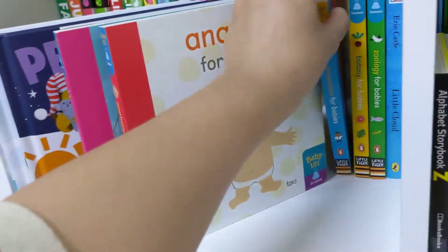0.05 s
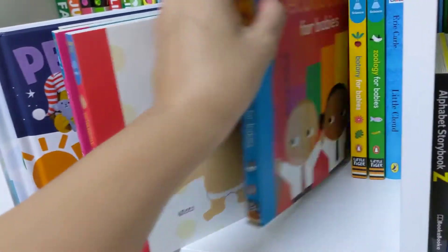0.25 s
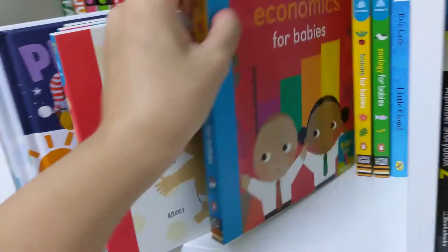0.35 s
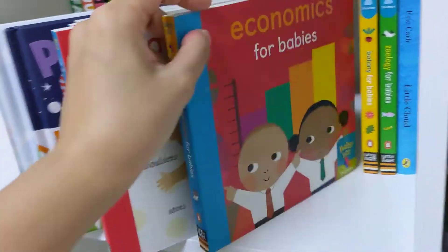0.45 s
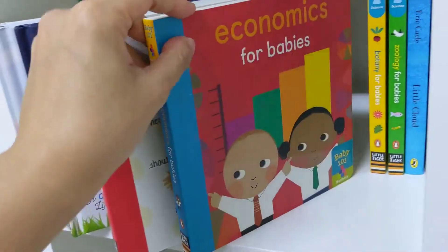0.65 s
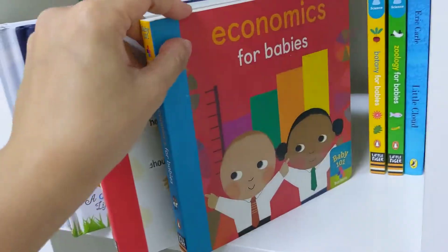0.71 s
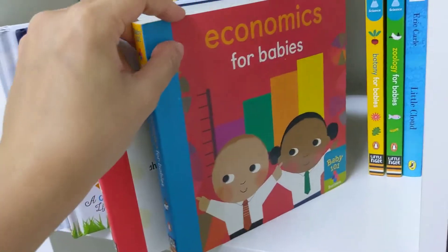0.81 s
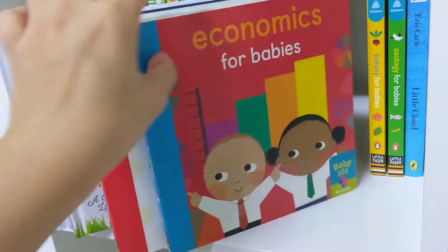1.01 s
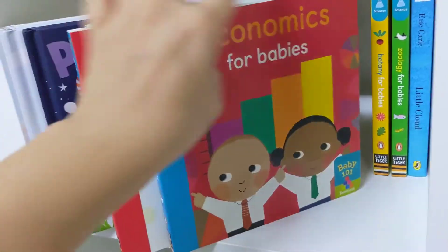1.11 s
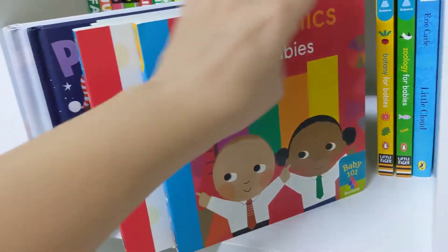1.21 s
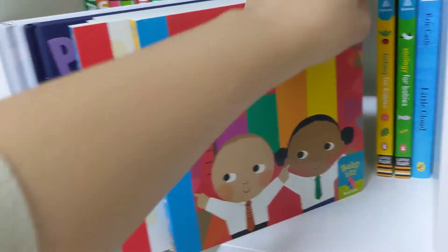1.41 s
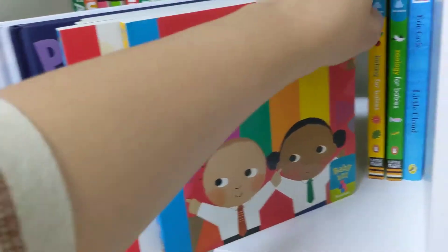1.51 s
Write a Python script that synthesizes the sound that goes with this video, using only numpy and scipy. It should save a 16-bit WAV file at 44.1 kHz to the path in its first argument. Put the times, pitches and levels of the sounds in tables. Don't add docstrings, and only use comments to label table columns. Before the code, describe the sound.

Thick cardboard books knock on a hollow shelf, heard close in a quiet room. After faint rubbing, a book comes loose with a bump and scrape at 0.2 seconds, then drops with the loudest clack at 0.31. Smaller knocks follow at 0.46, 0.55 and 0.61, with a tap at 0.64. Then only faint ticks, a soft muffled thud near 1.1, and tiny skin squeaks around 1.25 over low room air.

```python
import sys
import numpy as np
from scipy import signal
from scipy.fft import irfft
from scipy.io import wavfile
from scipy.ndimage import uniform_filter1d

SR = 44100
rng = np.random.default_rng(int(sys.argv[2]) if len(sys.argv) > 2 else 0)


def store_pcm(level_fs):
    pcm = np.round(np.clip(level_fs, -1, 1) * 32767).astype(np.int16)
    wavfile.write(sys.argv[1], SR, np.atleast_2d(pcm).T)


def how_loud(loudness_db):
    steps = np.asarray(loudness_db, float) / 20
    return 10 ** steps


N = 68355

# (frequency [Hz], level [dB], t60 [s])
SHELF = [(160, -5, .12), (197, -2, .1), (255, -4, .07), (292, 0, .08)]
# (frequency [Hz], likeness [0-1])
LIKENESS = [(40, 1), (150, 0.93), (300, .9), (700, 1), (1400, 0.7), (3000, 0)]


def evened(x):
    return x / np.sqrt(np.mean(x ** 2) + 1e-20)


def read(points, hz):
    f, value = np.transpose(points)
    return np.interp(np.log(hz + 1), np.log(f + 1), value)


def add(mix, s, sound):
    part = mix[..., round(s * SR):][..., :sound.shape[-1]]
    part += sound[..., :part.shape[-1]]


def partly_alike(left, other, hz):
    same = np.clip(read(LIKENESS, hz), 0, 1)[:, None]
    return np.array([left, same * left + np.sqrt(1 - same ** 2) * other])


def noise(colour, patchy_db, size=512):
    frames, hz = 4 * N // size + 5, np.fft.rfftfreq(size, 1 / SR)
    a, b, c, d, patches = rng.standard_normal((frames, len(hz), 5)).T
    patches = uniform_filter1d(patches, size=8, axis=0)
    patches = evened(uniform_filter1d(patches, size=8, axis=1))
    z = partly_alike(a + 1j * b, c + 1j * d, hz)
    z *= how_loud(read(colour, hz)[:, None] + patchy_db * patches)
    sound = signal.istft(z, nperseg=size, noverlap=3 * size // 4)[1]
    return evened(sound[:, :N])


def ring(modes, lasting=1):
    t, side = np.arange(SR // 4) / SR, np.array([[1], [-1]])
    port_turn = 0.19
    total = 0
    for k, (hz, db, t60) in enumerate(modes):
        sign = (-1) ** (k % 3 // 2)
        level = how_loud(db - 60 * t / (t60 * lasting)) / np.sqrt(lasting)
        turn = side * port_turn * (-1) ** k * np.minimum(hz * t, 1) * min(hz / 1000, 1)
        total = total + sign * level * np.sin(2 * np.pi * hz * t + turn)
    return total


def knocks(contacts, modes, stilled, crackle, lasting):
    out, t = np.zeros((2, N)), np.arange(SR // 20) / SR
    free, shelf = ring(modes, lasting), ring(SHELF)
    still_s, still_db_per_s = stilled
    crack_rise_s, crack_t60_s = 0.00039, 0.017
    crack_shape = np.minimum(t / crack_rise_s, 1) * how_loud(-60 * t / crack_t60_s)
    for s, db, contact_ms, shelf_db, crack_db in contacts:
        u = t[:200] / (max(contact_ms, .05) / 1000)
        push = np.sin(np.pi * np.minimum(u, 1)) ** 2
        pressed = np.maximum(np.arange(SR // 4) / SR + s - max(still_s, s), 0)
        board = free * how_loud(-abs(still_db_per_s) * pressed)
        body = signal.oaconvolve(board + how_loud(shelf_db) * shelf, push[None] / push.sum())
        add(out, s, how_loud(db - 9.5) * body)
        crack = crackle[:, round(s * SR):][:, :len(t)] * crack_shape
        add(out, s, how_loud(db + crack_db) * crack)
    return signal.sosfilt(signal.butter(2, 110, "high", fs=SR, output="sos"), out)


def book_knocks(crackle, lasting):
    # (frequency [Hz], level [dB], t60 [s])
    pulled_book = [(344, -3, 0.04), (568, 4, 0.028), (780, -0.5, 0.012), (1310, -5.5, 0.033),
                   (1680, -7.5, 0.051), (1900, -8, 0.04), (2920, -14, .025), (3900, -7.5, .03),
                   (440, -3, 0.024)]
    front_book = [(405, 2.5, 0.068), (487.4, -3, 0.097), (549, -9, 0.21), (715, 2, 0.045), (910, -1.5, .04),
                  (936, -17, 0.12), (1148, 5.5, 0.051), (1295, -4, .05), (1430, -1, 0.089),
                  (1578, 3.5, .05), (1765, -0.5, 0.13), (1923, -9, 0.15), (2970, -16, .04),
                  (2950, -15, .04)]
    back_book = [(321.6, -1, 0.12), (442, -7.5, 0.092), (580, 4, 0.059), (717, 0.5, 0.054),
                 (820, 1.5, 0.032), (1164, 5, 0.039), (1300, 5.5, 0.034), (920, -13, 0.022)]
    inner_book = [(300, -2.5, 0.035), (363.5, -1.5, 0.11), (442.5, -1.5, 0.15), (567, 0, 0.04),
                  (680, 1.5, 0.035), (910, 0, 0.09), (1114, -4, 0.026), (1252, -4.5, 0.058),
                  (1450, 4.5, 0.023), (1805, -2.5, 0.067), (2080, -19, 0.024), (2520, -24, 0.022),
                  (2880, -20, 0.027), (3220, -16, .03)]
    spine = [(480, -8, .05), (600, -1, .06), (730, -7, .04), (842, 5, .12), (1150, 6.5, .12),
             (1270, -3, .05), (1490, -5, .025), (1700, -10, .04), (2100, -9, .05), (2770, -10, .04),
             (3230, -11, .03), (231, -10, .06)]
    stack = [(108, -2, 0.61), (211, 2.5, 0.084), (290, 2, 0.098), (481, -2, 0.1), (878, 13.5, 0.042),
             (1100, 7.5, 0.028), (1315, 9, 0.045), (1860, -3, 0.051)]
    # (time [s], blow [dB], contact [ms], shelf share [dB], crack [dB])
    pull = [
        (.2008, -22, .2, -4.5, -5.5),
        (.2142, -18.5, .25, -7.5, -24),
        (.2162, -13.5, .8, -1.5, -25.5),
        (.2240, -32.5, .6, -2, -21.5),
        (.2340, -18.5, .16, -5, -2),
        (.2385, -38.5, .3, -4, -21),
    ]
    drop = [
        (.3110, -20, 0.11, -18.5, -17),
        (.3125, -5, 0.25, -32.5, -13),
        (.3145, -10, 0.19, -3, 0),
        (.3185, -13, 0.23, 0.5, -25.5),
        (.3245, -23.5, 0.55, 0, -28),
        (.3400, -21.5, 0.25, -11.5, -24.5),
        (.3445, -32, 0.74, -1.5, -25.5),
    ]
    settle = [
        (.4600, -21, 0.39, -31, -25.5),
        (.4635, -17, 1.04, -5.5, -32),
        (.4680, -22, 0.71, 4.5, -21.5),
        (.4740, -32.5, 1.6, -2.5, -34),
    ]
    slap = [
        (.5535, -28, 0.44, -1, 5.5),
        (.5550, -14, 0.41, -27.5, -10.5),
        (.5580, -20.5, .8, -26, -9),
        (.5615, -20.5, 1.5, -19, -18),
        (.5690, -28, 1.54, 6.5, -26),
    ]
    lean = [
        (.6130, -23, 0.5, -24, 2),
        (.6149, -15, 0.44, -9, -2),
        (.6184, -19, 0.51, -42, -19),
        (.6211, -23.5, 0.18, -21, -7),
    ]
    fall_back = [
        (1.096, -47, 1.2, 0, -11),
        (1.109, -40.5, 0.26, -3, -22),
        (1.120, -41.5, 1.3, 7, -23),
        (1.129, -42, 0.41, -1.5, -25),
        (1.145, -42, 1.8, -4, -22),
        (1.165, -54, 1.1, 2, -5),
    ]
    # (from time [s], extra decay [dB/s])
    free, drop_stilled, lean_stilled = (2, 0), (.3235, 1300), (.6235, 2200)
    hits = [(pull, pulled_book, free), (drop, front_book, drop_stilled), (settle, back_book, free),
            (slap, inner_book, free), (lean, spine, lean_stilled), (fall_back, stack, free)]
    return sum(knocks(*hit, crackle, lasting) for hit in hits)


def strokes(rows, release=1.3):
    t, power = np.arange(N) / SR, np.zeros(N)
    for start, length, db, rise in rows:
        u, rise = np.clip((t - start) / length, 0, 1), np.clip(rise, .02, .95)
        fall = np.clip((1 - u) / (1 - rise), 0, 1) ** release
        power += (how_loud(db) * np.minimum(u / rise, 1) * fall) ** 2
    return np.sqrt(power)


def grit(depth_db, size):
    return evened(how_loud(depth_db * evened(uniform_filter1d(rng.standard_normal(N), size))))


def cover_slides(cover):
    # (start [s], length [s], level [dB], rising share [0-1])
    slides = [
        (.2005, 0.029, -33, 0.12),
        (.234, 0.16, -30, 0.015),
        (.31, 0.021, -27, 0.047),
        (.44, 0.29, -54.5, 0.23),
        (.59, 0.04, -55, 0.2),
        (1.08, 0.013, -53, 0.038),
        (.11, 0.052, -56, 0.19),
        (1.25, 0.13, -59, 0.43),
    ]
    return cover * grit(1.3, size=60) * strokes(slides, release=0.64)


def hand_rubs():
    # (frequency [Hz], level [dB])
    hand = [(150, -6.5), (400, -10), (1000, -11), (2400, -10.5), (4500, -15.5), (6500, -21.5), (9000, -27),
            (16000, -23)]
    # (start [s], length [s], level [dB], rising share [0-1])
    rubs = [
        (-.05, 0.15, -55.5, 0.17),
        (.11, 0.18, -42.5, 0.8),
        (.24, 0.14, -36, 0.64),
        (.33, 0.25, -39.5, 0.075),
        (.57, 0.056, -43, 0.56),
        (1.03, 0.083, -58.5, 0.19),
        (1.075, 0.096, -46, 0.3),
    ]
    return noise(hand, patchy_db=-2.0) * grit(2.1, size=120) * strokes(rubs, release=0.96)


def shelf_rumble():
    # (start [s], length [s], level [dB], rising share [0-1])
    rumbles = [
        (1.185, 0.16, -63, 0.69),
        (0.34, 0.075, -48.5, .2),
        (0.996, 0.32, -52.5, 0.42),
    ]
    shaken = signal.oaconvolve(rng.standard_normal(N), ring(SHELF)[0])[:N]
    return evened(shaken) * strokes(rumbles, release=3.3)


def squeaks():
    # (start [s], length [s], level [dB], centre [Hz], width [Hz], rising share [0-1])
    slips = [
        (1.252, .085, -65, 4700, 600, .25),
        (1.297, .038, -63, 3300, 450, .6),
        (1.41, .13, -76, 4520, 60, .5),
        (1.08, .016, -62, 3500, 300, .5),
        (.84, .075, -61, 3200, 2400, .6),
        (1.252, .11, -64, 3600, 2400, .05),
        (1.30, .035, -69, 2000, 250, .6),
        (1.075, .02, -66, 12000, 500, .4),
        (1.03, .02, -66, 3300, 500, .5),
    ]
    t, out = np.arange(N) / SR, np.zeros((2, N))
    for s, length, db, hz, width, rise in slips:
        keep = np.exp(-np.pi * width / SR)
        fuzz = signal.lfilter([1], [1, -2 * keep, keep ** 2], rng.standard_normal((2, 2, N)))
        tone = fuzz[0] * np.cos(2 * np.pi * hz * t) + fuzz[1] * np.sin(2 * np.pi * hz * t)
        out += evened(tone) * strokes([(s, length, db, rise)], release=.5)
    return out


def ticks(bright):
    # (time [s], tap [dB], snap [dB], low pitch [Hz], high pitch [Hz])
    partings = [
        (0.109, -55.5, -52.5, 300, 667),
        (.641, -30.5, -61, 855, 1570),
        (0.772, -56.5, -50, 505, 835),
        (0.804, -49, -52.5, 520, 820),
        (.931, -55, -50, 587, 1100),
        (0.975, -56.5, -55.5, 600, 1015),
        (1.058, -53, -62, 445, 796),
        (1.228, -55.5, -87, 260, 855),
        (1.2518, -61, -55, 504, 1380),
        (1.358, -60.5, -83, 386.4, 402.4),
    ]
    out, t = np.zeros((2, N)), np.arange(SR // 20) / SR
    for s, tap_db, snap_db, low_hz, high_hz in partings:
        add(out, s, how_loud(tap_db) * ring([(low_hz, 0, .05), (high_hz, 0, .05)]))
        snap = how_loud(snap_db - 60 * t / .035) * np.minimum(t / .0003, 1)
        add(out, s, snap * bright[:, round(s * SR):][:, :len(t)])
    return out


def room(blows, rest):
    # (frequency [Hz], t60 [s])
    decay = [(150, 0.57), (400, 0.27), (1000, 0.43), (2500, 0.52), (6000, 0.38), (14000, 0.36)]
    taps = np.zeros((2, SR // 2))
    at = np.arange(300, SR // 2 - 20, 20)
    at = at + rng.integers(0, 20, (2, len(at)))
    np.put_along_axis(taps, at, rng.choice([-1., 1.], at.shape), 1)
    hz, t, z = signal.stft(taps, SR, nperseg=256)
    z = partly_alike(z[0], z[1], hz)
    tail = signal.istft(z * how_loud(-60 * t / read(decay, hz)[:, None]), SR, nperseg=256)[1]
    x = rest + blows * evened(uniform_filter1d(rng.standard_normal(N), size=50))
    return signal.fftconvolve(x, tail / np.linalg.norm(tail[0]), axes=1)[:, :N]


def room_air():
    # (frequency [Hz], level [dB])
    air = [(30, 18.5), (110, -0.5), (160, 14.5), (230, -11), (800, -11), (3000, -14), (8000, -19),
           (13500, -14.5)]
    return noise(air, .6, size=2048)


def scene():
    # (frequency [Hz], level [dB])
    crack_colour = [(300, -8), (1000, 11.5), (2500, 5.5), (4500, -5), (8000, -22.5), (13000, -18.5),
                    (16000, -33.5)]
    # (frequency [Hz], level [dB])
    cover_colour = [(150, -3), (600, -17.5), (2400, -5.5), (5000, -3.5), (8000, -5), (12000, 1), (14500, 5),
                    (16500, -15.5)]
    crackle, cover = noise(crack_colour, patchy_db=1.5), noise(cover_colour, patchy_db=0.7)
    books = book_knocks(crackle, 0.91)
    scattered = book_knocks(crackle, .12)
    rest = cover_slides(cover) + hand_rubs() + shelf_rumble()
    rest = rest + how_loud(2.5) * squeaks() + ticks(cover + 1.3 * crackle)
    room_db, air_db = -10.5, -55
    return books + rest + how_loud(room_db) * room(scattered, rest) + how_loud(air_db) * room_air()


def top_cut(x):
    return signal.sosfilt(signal.butter(12, 16810, fs=SR, output="sos"), x)


def record(dry):
    # (frequency [Hz], level over left [dB])
    right_port = [(700, -0.5), (1400, 2.5), (2300, 2.5), (3400, 8), (4700, 3.5), (6200, -3), (8500, -12.5),
                  (12000, -25.5)]
    lag_samples, low_cut_hz, edge_hz = 8, 135, 16050
    hz = np.fft.rfftfreq(2048, 1 / SR)
    gain = how_loud(read(right_port, hz)) * np.exp(-2j * np.pi * hz * lag_samples / SR)
    port = np.roll(irfft(gain), 1024) * np.hanning(2048)
    pair = np.array([dry[0], signal.oaconvolve(dry[1], port)[1024:][:N]])
    pair = signal.sosfilt(signal.butter(2, low_cut_hz, "high", fs=SR, output="sos"), pair)
    pair = 1.1 * np.tanh(pair / 1.1)
    pair = signal.oaconvolve(pair, signal.firwin(255, edge_hz, fs=SR)[None], "same")
    return top_cut(pair)


dry = scene()
out = record(dry)
store_pcm(out)
```